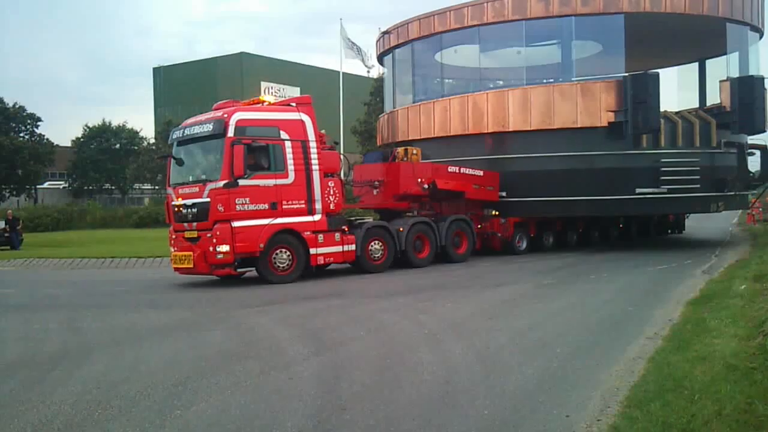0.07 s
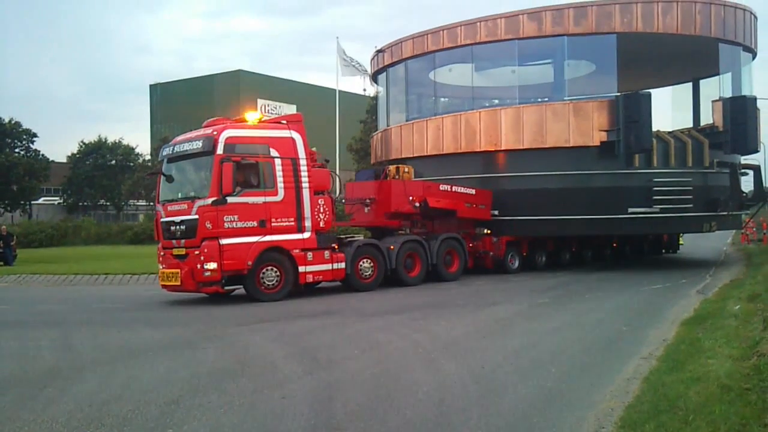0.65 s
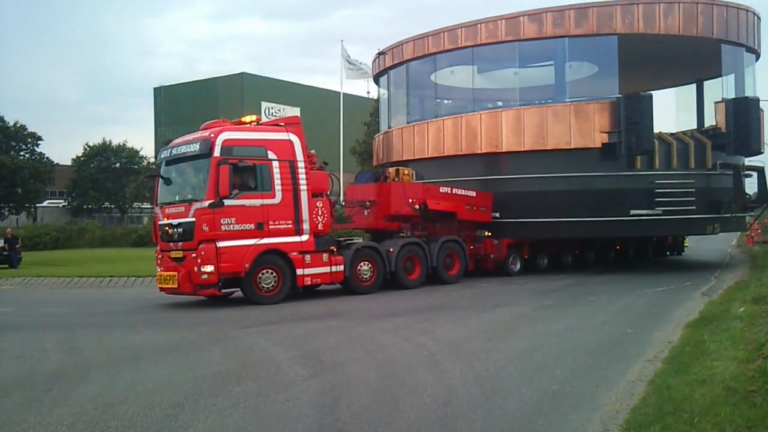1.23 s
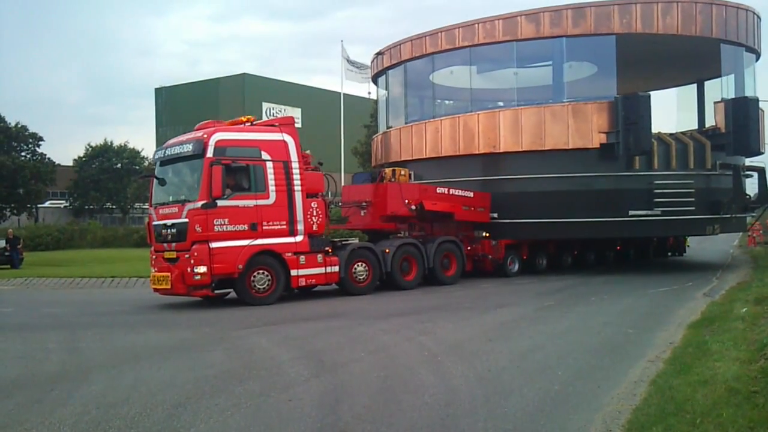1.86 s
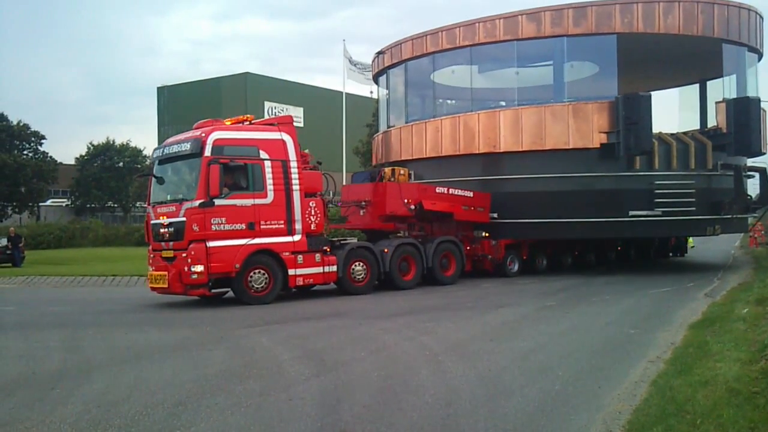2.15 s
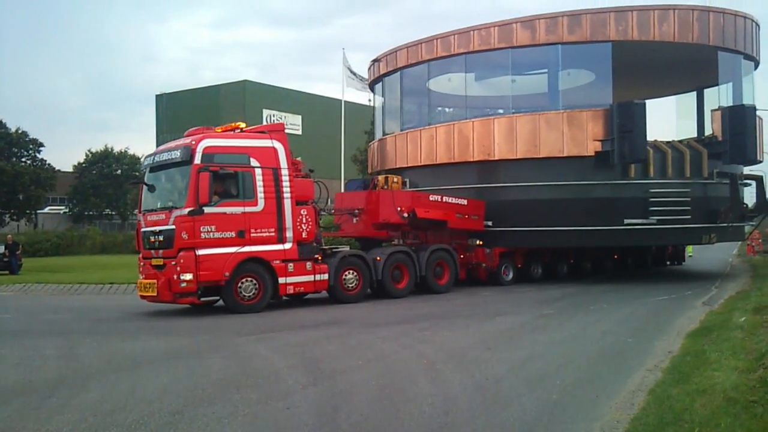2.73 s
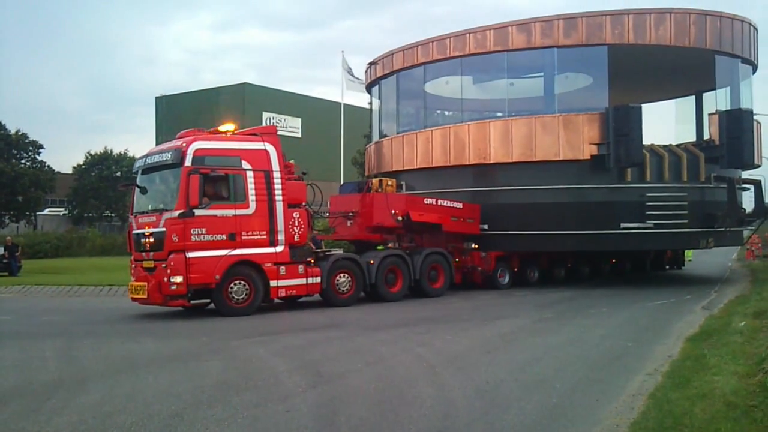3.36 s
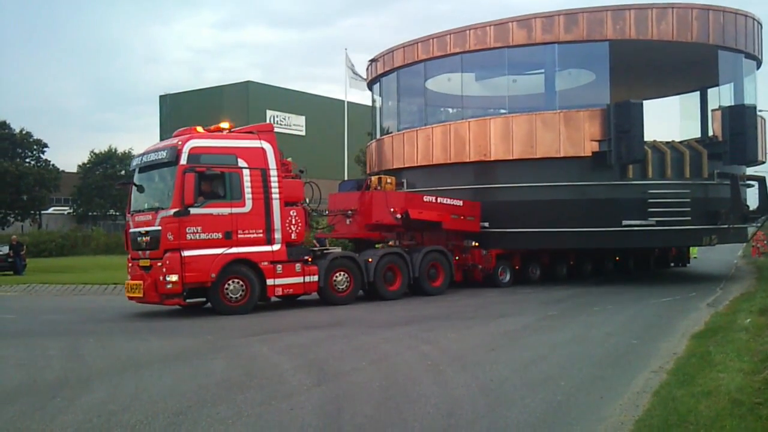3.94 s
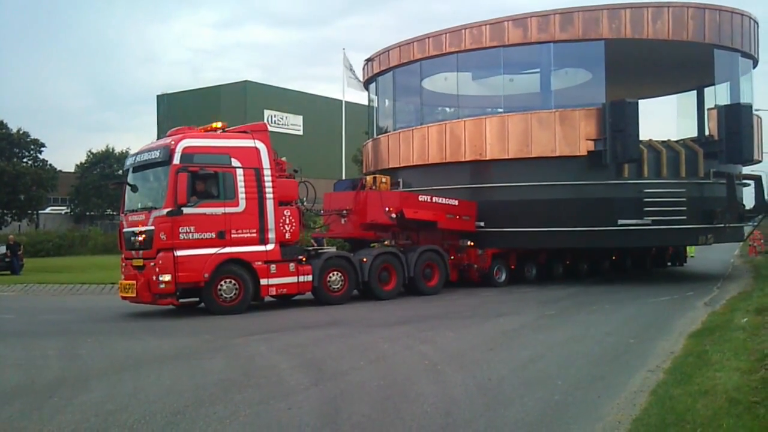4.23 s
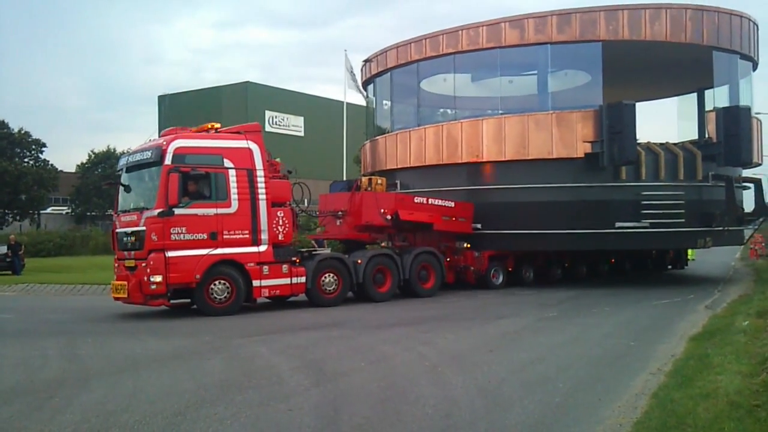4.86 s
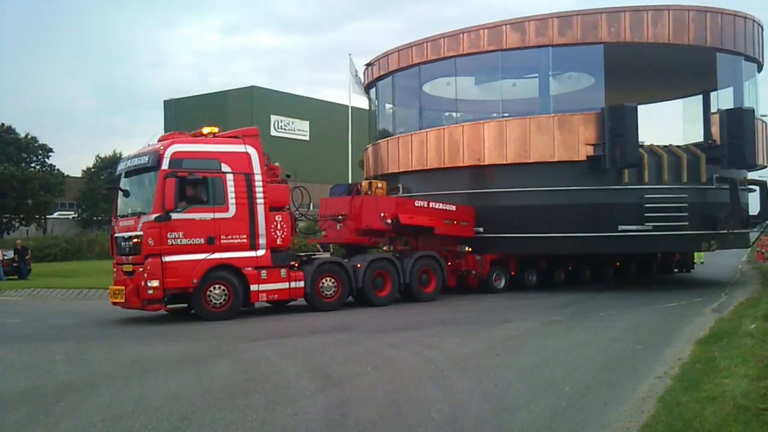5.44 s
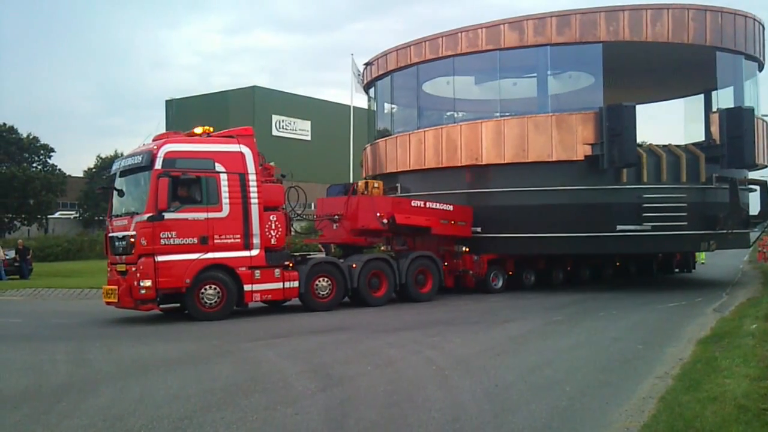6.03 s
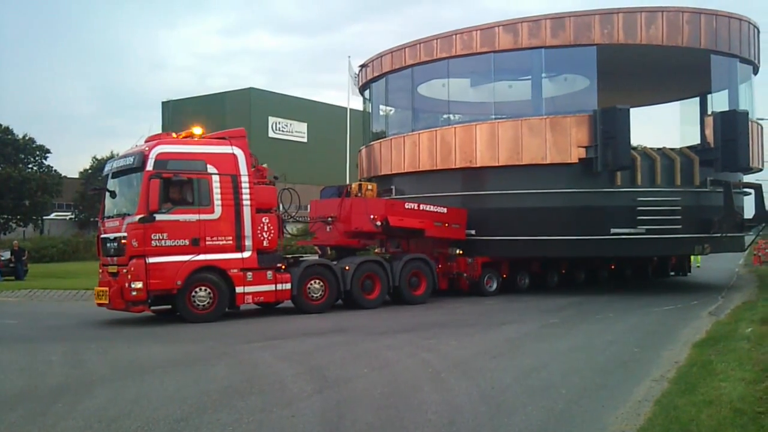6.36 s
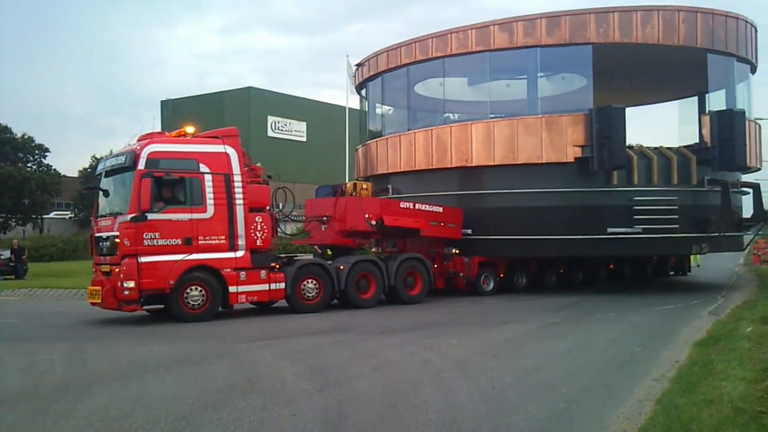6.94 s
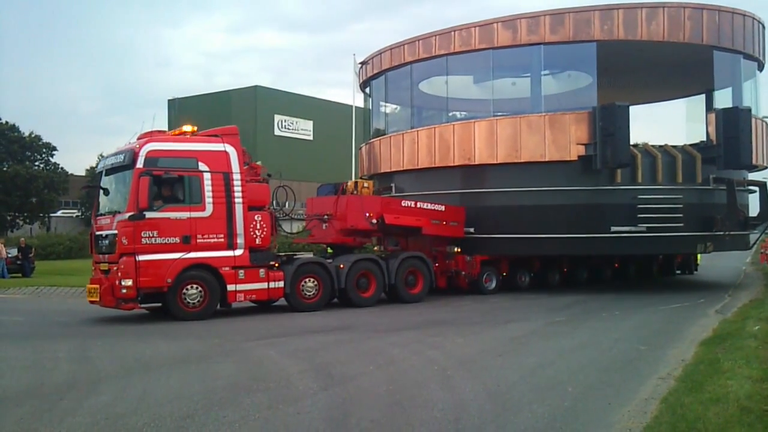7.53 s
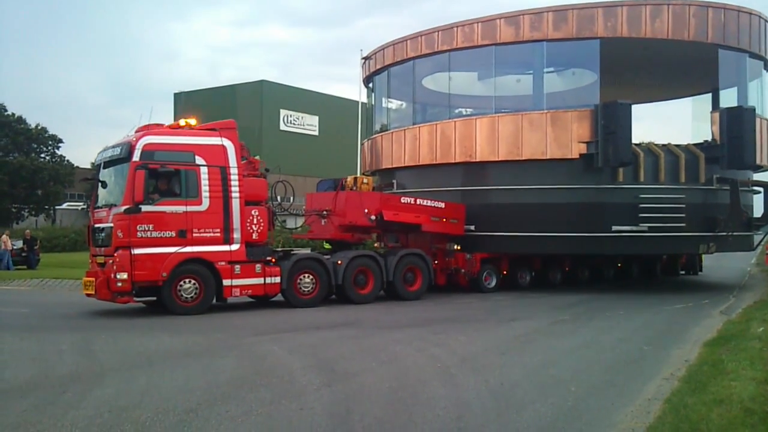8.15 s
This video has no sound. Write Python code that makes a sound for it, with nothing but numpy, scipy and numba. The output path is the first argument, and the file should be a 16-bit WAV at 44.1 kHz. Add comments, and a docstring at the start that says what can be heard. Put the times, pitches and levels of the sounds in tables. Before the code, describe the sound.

A heavy diesel truck creeps along with a steady engine rumble while gusty wind buffets the microphone.

```python
"""Diesel truck in gusty wind

A heavily loaded diesel truck creeps past at steady revs, its firings pulsing the exhaust and clatter.
Turbulent wind beats on a camera's microphone and now and then overloads the preamplifier.
Gain control holds the rumble level, so the engine surges in every lull and ducks under every gust."""
import sys
import numpy as np
from scipy import signal
from scipy.fft import rfft, irfft, next_fast_len
from scipy.io import wavfile
from scipy.ndimage import map_coordinates
from numba import njit

SR = 44100
rng = np.random.default_rng(int(sys.argv[2]) if len(sys.argv) > 2 else 0)


def generate_wav(sig):
    """Save sig (samples, or channels by samples) to the path in sys.argv[1] as 16-bit PCM at SR."""
    pcm = np.round(np.clip(np.atleast_2d(sig).T, -1, 1) * 32767).astype(np.int16)
    wavfile.write(sys.argv[1], SR, pcm)


N = 361179
TIME = np.arange(N) / SR
NOMINAL_EDDY_HZ = 330  # eddy rate at which a turbulence spectrum sounds unshifted


def amp(db):
    """Decibels to amplitude ratio."""
    return 10 ** (np.asarray(db) / 20)


def unit(x):
    """Normalisation to an rms of 1."""
    return x / np.sqrt(np.mean(x ** 2) + 1e-20)


def wobble(rate):
    """Smooth random modulation: a spline through `rate` knots a second."""
    return map_coordinates(rng.standard_normal(int(N * rate / SR) + 4), [TIME * rate])


def filtered(x, response):
    """Linear filtering: the spectrum of x times a frequency response."""
    size = next_fast_len(len(x) + 8192)
    return irfft(rfft(x, size) * response(np.fft.rfftfreq(size, 1 / SR)), size)[:len(x)]


def coloured(x, points):
    """Spectral shaping by (Hz, dB) points on a logarithmic frequency axis."""
    corners, db = np.transpose(points)
    return filtered(x, lambda hz: amp(np.interp(np.log(hz + 1), np.log(corners), db)))


def evened(x, span_s):
    """Envelope flattening: the running rms over span_s is held at 1."""
    window = np.hanning(int(span_s * SR) + 3)
    power = signal.fftconvolve(x ** 2, window / window.sum(), "same")
    return x / np.sqrt(np.abs(power) + 1e-9)


# Exhaust and engine block. Each row: frequency in Hz, relative spectral density in dB.
BLOCK_SPECTRUM = [(20, -6), (45, -1), (85, 4), (220, -1), (310, -15), (400, -18), (500, -3), (560, -4),
                  (610, 0), (720, -10), (850, -19.5), (980, -12.5), (1150, -13), (1270, -19.5),
                  (1450, -22.5), (1590, -36), (3000, -67)]
# Injectors, valve gear and fan. Each row: frequency in Hz, relative spectral density in dB.
CLATTER_SPECTRUM = [(600, -26.5), (1600, -17.5), (1790, -1), (1900, -4), (2050, 0), (2350, -1.5),
                    (3150, -1.5), (3330, -5.5), (3550, -2), (3850, -6.5), (4050, -4), (4520, -3),
                    (5000, -12), (5600, -10.5), (6700, -9), (10000, -12)]
# Gear and turbocharger tones. Each row: frequency in Hz, level in dB.
WHINE_TONES = [(1480, -56), (2089, -54.5), (2692, -59), (3232, -57.5), (4484, -57), (5169, -68.5)]


def engine(firing_hz=46.87, block_db=-25.5, clatter_db=-36.1, thump_db=-33, knock=0.12, scatter_db=2):
    """Periodic excitation: each firing thumps and modulates the noise; whines track the shaft speed."""
    speed = 1 + .0022 * wobble(1.8)
    shaft_time = np.cumsum(speed) / SR
    firings = np.sin(np.pi * firing_hz * shaft_time) ** 4 * amp(scatter_db * wobble(40))
    firings -= firings.mean()
    pulsing = 1 + knock * unit(firings)
    block = unit(coloured(pulsing * rng.standard_normal(N), BLOCK_SPECTRUM))
    clatter = unit(coloured(pulsing * rng.standard_normal(N), CLATTER_SPECTRUM))
    thump = unit(coloured(firings, BLOCK_SPECTRUM))
    whine = np.zeros(N)
    for hz, db in WHINE_TONES:
        gain = amp(db + 1.5 * wobble(13))
        whine += gain * unit(np.sin(2 * np.pi * hz * shaft_time + 0.98 * wobble(27)))
    return amp(block_db) * block + amp(clatter_db) * clatter + amp(thump_db) * thump + whine


# The truck's passage. Each row: time in seconds, gain in dB.
APPROACH_GAIN = [(0, 3.5), (1.199, 0), (2.6, 0.5), (4.6, 2.5), (5.7, 6), (7.1, 5.5), (8.19, 4.5)]


def nearness():
    """Geometric spreading: the nearer the truck, the higher its gain."""
    return amp(np.interp(TIME, *np.transpose(APPROACH_GAIN)))


# The wind slackens, then freshens. Each row: time in seconds, strength in dB.
WIND_TREND = [(0, -3.5), (.45, -3.5), (.75, -10.5), (1.6, -12), (2.85, -14), (3.15, -5.5), (3.5, -8),
              (4.1, -6.5), (4.65, -2), (5.05, -3.5), (5.8, 4), (6.4, 0), (6.7, 3), (7.2, 5), (7.8, 4),
              (8.19, -1)]
# Lulls that let the truck through. Each row: centre in seconds, half length in seconds, depth in dB.
WIND_LULLS = [(0.108, 0.041, 6), (0.206, 0.015, 7), (0.674, 0.015, 6), (.772, .04, 6), (0.855, 0.024, 3),
              (0.952, 0.027, 20), (1.2, .03, 4), (1.265, 0.032, 22), (1.45, 0.045, 12), (1.748, 0.023, 6),
              (1.976, 0.014, 11), (2.157, 0.044, 3), (2.329, .026, 13), (2.528, 0.056, 26),
              (2.618, 0.026, 13), (2.715, 0.071, 16), (2.945, .035, 15), (3.065, .032, 9),
              (3.298, 0.049, 10), (3.44, .035, 7), (3.503, .027, 25), (3.61, 0.02, 8), (3.818, 0.028, 16),
              (3.885, 0.032, 6), (3.98, .03, 5), (4.232, .036, 7.5), (4.445, 0.042, 7), (4.753, .019, 6),
              (4.902, .04, 5), (5.195, 0.073, 11.5), (5.482, 0.028, 11), (6.043, .035, 13),
              (6.334, 0.036, 4.5), (6.559, .045, 9), (6.801, .05, 4), (8.079, 0.035, 4)]


def wind_strength(sag_power=2.2, return_power=3):
    """Intermittent flow: the strength in dB sags gently into each lull and returns more abruptly."""
    sag_db = np.zeros(N)
    for centre, half_length, depth_db in WIND_LULLS:
        distance = np.minimum(np.abs(TIME - centre) / half_length, 4)
        sag_db += depth_db * np.exp(-distance ** np.where(TIME < centre, sag_power, return_power))
    return np.interp(TIME, *np.transpose(WIND_TREND)) - sag_db


# Turbulent pressure at the nominal eddy rate. Each row: frequency in Hz, relative density in dB.
EDDY_SPECTRUM = [(8, -16), (25, -2), (60, -1.5), (150, 0), (250, -5), (400, -12.5), (600, -23.5),
                 (900, -36), (1500, -43.5), (3000, -77.5), (6000, -120)]


def wind_rumble(strength_db, level_db=1.18, eddy_hz=349.9, flutter_db=3.0, swell_db=1.2):
    """Frozen turbulence: eddies blow past the microphone, higher and louder in each spurt of air."""
    flutter = wobble(65)
    gust_db = strength_db + swell_db * wobble(20)
    speed = eddy_hz / NOMINAL_EDDY_HZ * np.exp(.25 * (flutter - 1))
    pattern = coloured(rng.standard_normal(2 * N), EDDY_SPECTRUM)
    pressure = map_coordinates(pattern, [np.cumsum(speed)], mode="wrap")
    return amp(gust_db + level_db + flutter_db * flutter) * evened(pressure, span_s=0.035)


# Vortex pressure at the nominal eddy rate. Each row: frequency in Hz, relative density in dB.
VORTEX_SPECTRUM = [(10, -22.5), (40, -3.5), (130, 2.5), (250, -0.5), (380, -8.5), (550, -17.5), (900, -36),
                   (1500, -47.5), (3000, -88), (6000, -120)]
# Distinct blows of air. Each row: start in seconds, length in seconds, strength in dB, eddy rate in Hz.
HARD_BUFFETS = [(.011, .009, 2, 566), (0.157, 0.013, 1.5, 526), (0.239, 0.038, 5, 766),
                (0.278, .008, 3, 522), (.302, 0.023, 0, 516), (.346, 0.0078, 7, 560),
                (0.376, .017, 4.5, 560), (0.406, .008, 2.5, 480), (0.457, 0.0082, 0, 517),
                (0.489, 0.013, 2.5, 528), (.544, 0.036, 0, 560), (0.618, .016, 2, 460),
                (0.658, 0.015, -8, 483), (0.698, 0.012, 0, 561), (.802, 0.015, -7, 601),
                (0.88, .009, -7, 535), (1.03, .013, -5.5, 481), (1.076, .012, 3.5, 680),
                (1.144, .008, -5, 560), (1.303, .01, -5.5, 519), (1.342, 0.018, -9.5, 433),
                (1.547, .013, 0, 604), (1.579, 0.035, -2.5, 520), (1.686, .025, -9, 450),
                (1.772, 0.012, 3.5, 191), (1.884, .016, -0.5, 219), (1.945, .013, -7.5, 525),
                (1.994, 0.011, -3.5, 383), (2.011, .01, 3, 649), (2.171, .012, -13, 521),
                (2.191, .009, -12, 680), (2.251, 0.028, -8, 328), (2.357, 0.009, -7.5, 477),
                (2.385, .014, -3.5, 740), (2.408, .012, -4, 333), (2.786, 0.024, -7, 214.5),
                (3.001, .018, 0, 580), (3.115, 0.015, -2.5, 380), (3.366, .011, -2.5, 538),
                (3.392, .016, -6.5, 470), (3.529, 0.04, 2.5, 300), (3.653, .016, -4.5, 462),
                (3.691, 0.013, -1.5, 442), (3.751, 0.0099, 0.5, 592), (4.009, 0.011, -1, 563),
                (4.057, .008, -4, 518), (4.081, .013, -3, 520), (4.278, .024, 5.5, 600),
                (4.514, .02, 0, 449), (4.608, 0.023, 3, 470), (4.775, 0.022, 3.5, 779),
                (4.806, .009, 3, 657.6), (4.822, .006, 2.5, 665), (4.841, 0.0046, 4.5, 680),
                (4.89, .014, -4.5, 534), (4.922, .018, -0.5, 567), (4.97, 0.023, -1.5, 622),
                (5.028, 0.015, 8.5, 754), (5.269, 0.0096, 2.5, 594), (5.296, 0.012, 4, 560),
                (5.33, .016, 15, 636), (5.349, .006, 21, 560), (5.354, .012, 28, 740),
                (5.487, .022, -6.5, 586), (5.547, .016, 6.5, 435), (5.604, 0.018, 6, 575),
                (5.661, .018, 5, 600), (5.691, 0.042, 4, 716), (5.757, .023, 4.5, 826),
                (5.807, 0.06, 7, 554.8), (5.905, 0.031, 5, 662), (5.944, .009, 21, 739),
                (5.992, .015, 0, 597), (6.065, .01, 2, 560), (6.098, 0.012, 6, 581), (6.142, 0.022, 6, 614),
                (6.205, .012, 8.5, 622), (6.222, .009, 9, 755), (6.252, .008, 7, 659),
                (6.275, 0.01, 2, 557), (6.311, .018, 1, 559), (6.437, .018, 1, 605),
                (6.508, 0.014, -0.5, 524), (6.581, .03, 2.5, 697), (6.634, .014, 9.5, 651),
                (6.675, .01, 9.5, 561), (6.718, .022, 7.5, 282), (6.833, .02, 4.5, 520),
                (6.878, 0.018, 7, 800), (6.935, 0.014, 7, 420), (6.959, 0.011, 12, 659),
                (6.972, .009, 24.5, 715), (7.018, 0.024, 5, 619), (7.04, .007, 17, 736),
                (7.052, .009, 26.5, 863), (7.075, .018, 5, 700), (7.096, .016, 10, 700),
                (7.111, .007, 12, 740), (7.119, .005, 15, 620), (7.145, .014, 8, 680),
                (7.16, .009, 18, 580), (7.173, .01, 16, 640), (7.191, 0.0063, 19, 572),
                (7.223, .017, 8.5, 700), (7.259, .017, 8, 669), (7.426, 0.025, 3, 459),
                (7.472, 0.02, 8, 620), (7.534, 0.02, 6, 657), (7.621, 0.0068, 9, 578),
                (7.657, .034, 5.5, 718), (7.705, .013, 8, 858), (7.755, .012, 5, 760),
                (7.773, .008, 14, 680), (7.792, 0.012, 6.5, 840), (7.851, .015, 7, 997),
                (7.902, .011, 12, 680), (7.949, .009, 11.5, 677), (7.989, .024, 4, 600),
                (8.084, 0.018, 0.5, 697), (8.12, .012, 3, 579)]


def buffets(rows, rise_s=0.0016, fade_power=3, flutter_db=1.26):
    """Vortex impact: each vortex strikes the microphone, flaps in quick spurts and breaks off."""
    lead = SR // 100
    t = np.arange(-lead, SR // 4) / SR
    pattern = coloured(rng.standard_normal(2 * N), VORTEX_SPECTRUM)
    flutter = np.pad(wobble(190), (0, SR))
    onset = (1 + np.tanh(t / rise_s / 2)) / 2
    out = np.zeros(N + SR)
    for (start, length, db, eddy_hz), offset in zip(rows, rng.uniform(0, N, len(rows))):
        here = slice(round(start * SR), round(start * SR) + len(t))
        speed = eddy_hz / NOMINAL_EDDY_HZ * np.exp(0.0903 * (flutter[here] - .5))
        pressure = map_coordinates(pattern, [offset + np.cumsum(speed)], order=1)
        envelope = onset * np.exp(-(np.maximum(t, 0) / length) ** fade_power)
        out[here] += amp(db + flutter_db * flutter[here]) * envelope * evened(pressure, span_s=0.03)
    return out[lead:][:N]


def wakes(rows, depth_db=3.5, half_length_s=0.013, lag_s=0.007):
    """Wake deficit: slack air just behind each buffet lowers the gain of the steady flow."""
    t = np.arange(0, N / SR, .002)
    centres = [start + length + lag_s for start, length, _, _ in rows]
    slack = np.max([np.exp(-((t - centre) / half_length_s) ** 2) for centre in centres], axis=0)
    return amp(-depth_db * np.interp(TIME, t, slack))


def flurry(strength_db, per_second=30, length_s=0.0073, level_db=-6.5, eddy_hz=619.4, gap_s=.004):
    """A random point process: rows of tiny buffets, denser and stronger as the wind rises."""
    expected_count = np.cumsum(per_second * np.exp(0.19 * strength_db)) / SR
    arrivals = np.searchsorted(expected_count, np.cumsum(rng.gamma(2, .5, 480)))
    scatter = rng.standard_normal((len(arrivals), 3))
    rows = []
    for i, (length_scatter, level_scatter, rate_scatter) in zip(arrivals, scatter):
        busy = any(start - gap_s < i / SR < start + span + gap_s for start, span, _, _ in HARD_BUFFETS)
        if i < N and not busy:
            length = length_s * np.exp(0.28 * length_scatter)
            db = level_db + 0.99 * strength_db[i] + 2 * level_scatter
            hz = eddy_hz * np.exp(-0.0049 * strength_db[i] + .15 * rate_scatter)
            rows.append((i / SR, length, db, hz))
    return rows


def scene():
    """Superposition: truck, wind rumble and buffets add in one channel."""
    strength_db = wind_strength()
    blows = list(HARD_BUFFETS) + flurry(strength_db)
    truck = nearness() * engine()
    rumble = wakes(HARD_BUFFETS) * wind_rumble(strength_db)
    return (truck + rumble + buffets(blows))[None]


def overload(x, ceiling_db=8.0):
    """Hard clipping: the preamplifier cuts the strongest swings flat, which crackles."""
    return np.clip(x, -amp(ceiling_db), amp(ceiling_db))


@njit
def follower(size, attack, release):
    """Peak detection: an envelope that rises fast and sinks slowly; times are in samples."""
    out, level = np.empty(len(size)), size[:1000].max()
    for i in range(len(size)):
        level += (size[i] - level) / attack if size[i] > level else -level / release
        out[i] = level
    return out


def gain_control(x, target_db=-12.0, attack_s=0.0016, release_s=0.029):
    """Dynamic compression: the gain drops at once under a gust and creeps back after it."""
    envelope = follower(np.abs(x), attack_s * SR, release_s * SR)
    return x * amp(target_db) / (envelope + 0.0038)  # the offset caps the gain


# The microphone's colour. Each row: frequency in Hz, gain in dB.
MIC_RESPONSE = [(5, -22.5), (20, -2.5), (6800, -2.5), (7400, -12.5), (8000, -26.5), (8500, -14), (9200, -6),
                (9900, -18)]
# The camera's treble loss. Each row: frequency in Hz, gain in dB.
TREBLE_ROLL_OFF = [(6000, -1), (7400, -1.5), (8000, -3.5), (9200, -13.5), (9900, -15.5)]


def record(dry, top_hz=9900):
    """A signal chain in cascade: microphone colour, overload, gain control, roll-off and band limit."""
    held = gain_control(overload(coloured(dry[0], MIC_RESPONSE)))
    return filtered(coloured(held, TREBLE_ROLL_OFF), lambda hz: hz < top_hz)[None]


dry = scene()
out = record(dry)
generate_wav(out)
```